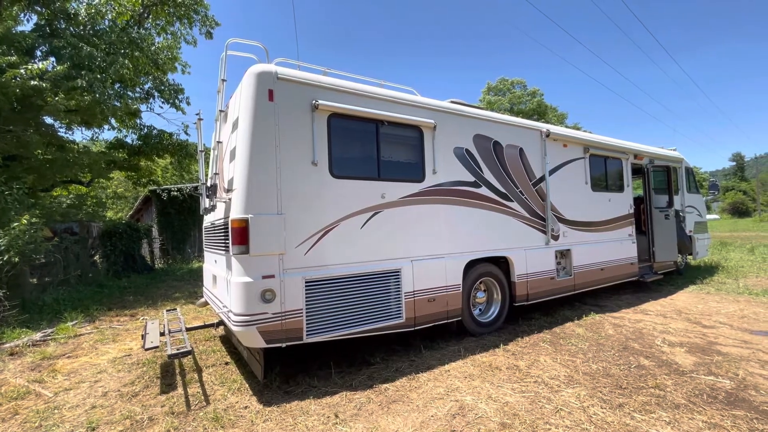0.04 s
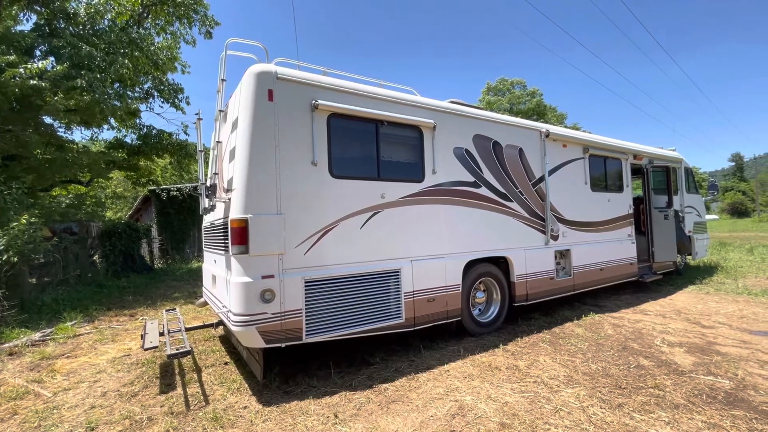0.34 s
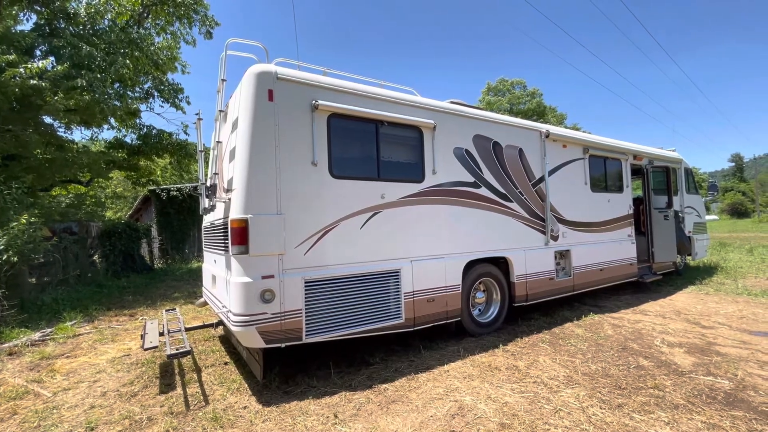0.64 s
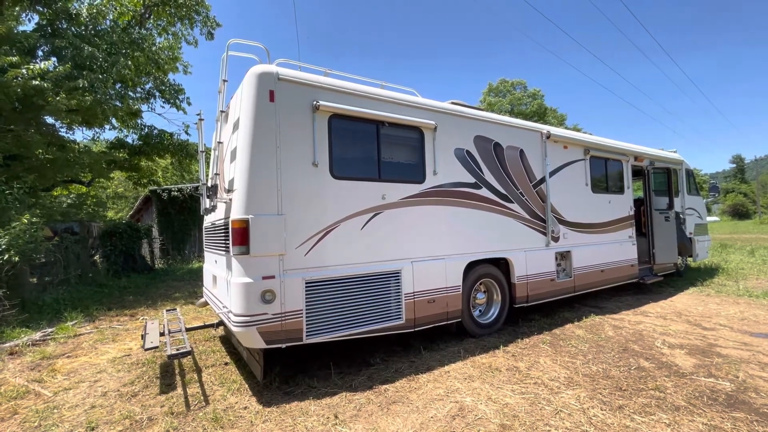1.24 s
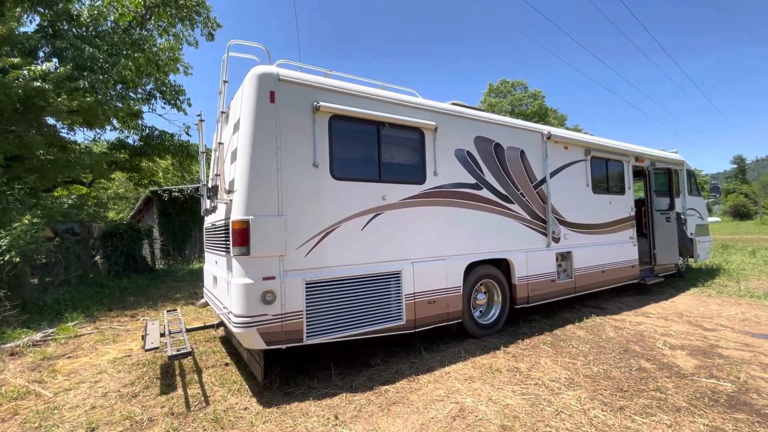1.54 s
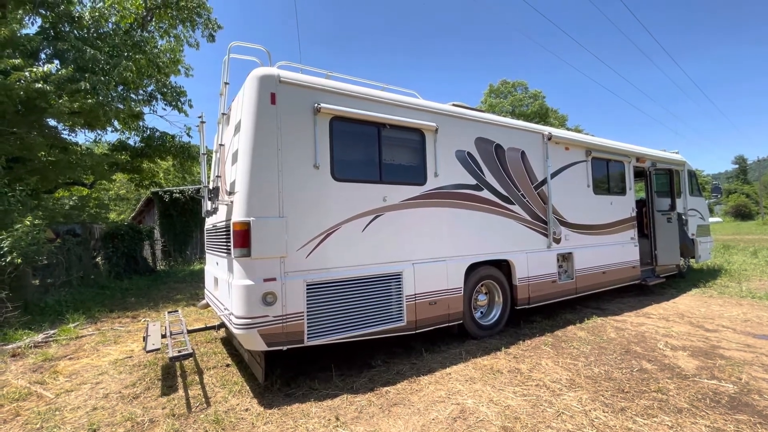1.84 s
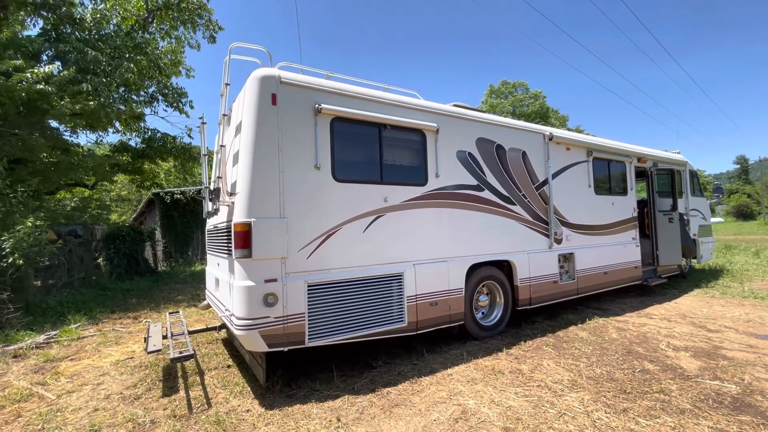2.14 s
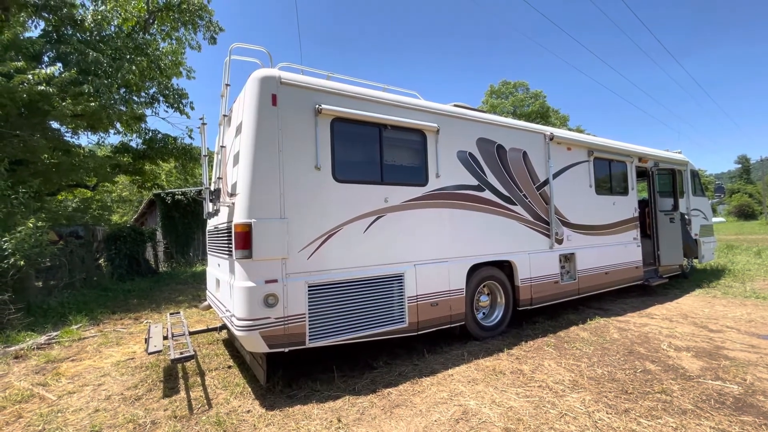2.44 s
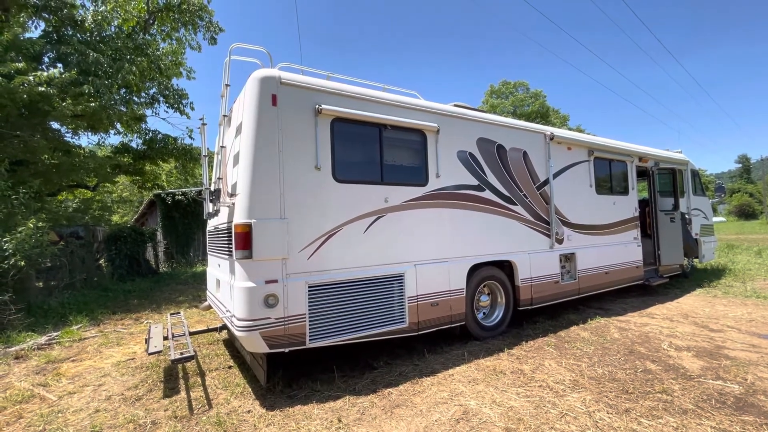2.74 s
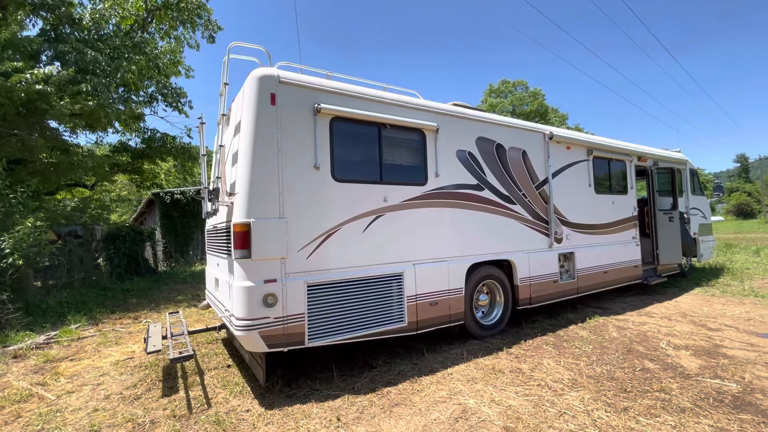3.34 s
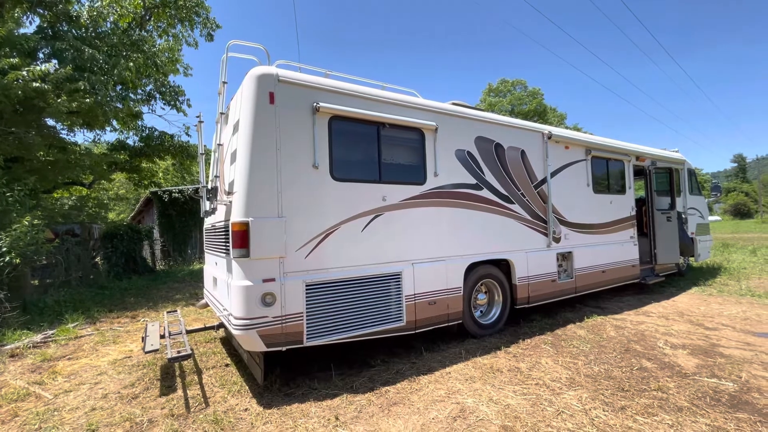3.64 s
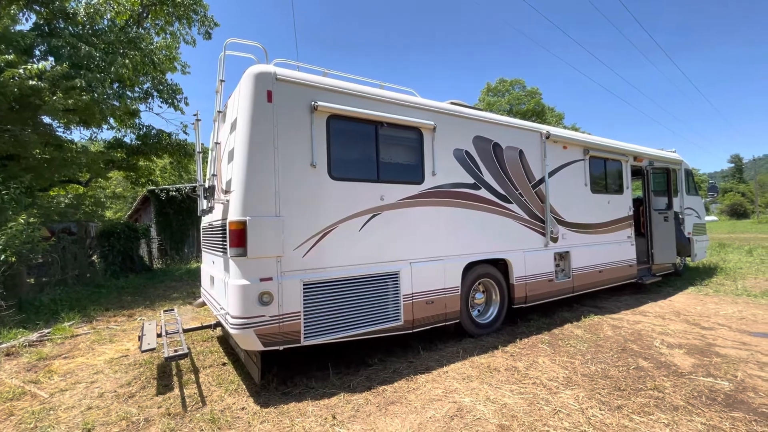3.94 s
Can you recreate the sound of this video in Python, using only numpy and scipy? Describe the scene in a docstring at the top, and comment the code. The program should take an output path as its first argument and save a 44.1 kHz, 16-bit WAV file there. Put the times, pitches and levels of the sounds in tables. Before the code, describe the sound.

A motorhome's diesel engine starts outdoors, a few metres away. After a quiet generator drone with thin hiss, the starter clacks in and grinds in pulses, then the engine catches with knocks, metal clanks and a low exhaust boom.

```python
"""Motorhome diesel, cold start.

Outdoors, a few metres from the rear corner. A small engine, probably the generator, drones; something
hisses. The starter pinion clacks in and the gears grind, sagging into each compression. Cylinders catch:
knocks ring the block, loose metal clanks, gas puffs down the pipe and the exhaust begins to boom."""
import sys
import numpy as np
from scipy import signal
from scipy.fft import rfft, irfft, next_fast_len
from scipy.io import wavfile

SR = 44100
rng = np.random.default_rng(int(sys.argv[2]) if len(sys.argv) > 2 else 0)


def log_audio(samples):
    """Write samples as a 16-bit WAV file to the path given in sys.argv[1]."""
    # one column per channel
    frames = np.atleast_2d(samples).T
    # limit to full scale, then quantise
    limited = np.clip(frames, -1, 1)
    pcm = np.round(limited * 32767).astype(np.int16)
    wavfile.write(sys.argv[1], SR, pcm)


N = 176400
TIME_S = np.arange(N) / SR

# cylinder firings: start_s, knock_db, puff_db
FIRINGS = [(2.927, -20.5, -29), (3.119, -21.5, -22.5), (3.172, -13, -23.5), (3.248, -10, -16.5),
           (3.309, -15, -11.5), (3.347, -7.5, -24), (3.397, -8.5, -21), (3.425, -11, -15.5),
           (3.459, -12, -14.5), (3.496, -11.5, -15.5), (3.534, -20, -16.5), (3.714, -10, -25),
           (3.75, -14, -19), (3.787, -7.5, -18.5), (3.821, -10.5, -25), (3.858, -15.5, -18.5),
           (3.889, -13, -33), (3.923, -15.5, -41), (3.982, -18, -43)]
# block and exhaust pipe spectra: freq_hz, density_db
KNOCK_SPECTRUM = [(200, -18.5), (400, -9.5), (1000, 5), (1320, 2), (1800, -8), (2400, -11.5), (5000, -25),
                  (7000, -34), (8800, -35), (13000, -52)]
PIPE_SPECTRUM = [(25, -26.5), (45, 3.5), (100, 2), (160, 3), (200, -5), (240, -0.5), (300, -5), (420, -10),
                 (700, -29)]
# resonances of block and bay, loose metal, generator casing: freq_hz, width_hz, lift_db
BLOCK_MODES = [(639, 7.7, 6.5), (762, 43, 4), (876, 60, 4.5), (1016, 21, 6.5), (1199, 21, 5), (1324, 96, 8),
               (1438, 62, 4)]
CLANK_MODES = [(5450, 190, 13.5)]
CASING_MODES = [(1382, 110, 10.5), (1649, 50, 10.5), (1995, 64, 9.5), (2568, 40, 11), (3216, 40, 9)]

# starter surges, one after each compression: start_s, length_s, grind_db, hum_db
SURGES = [(2.057, 0.014, -29.5, -45), (2.12, 0.11, -29, -26.5), (2.344, 0.096, -27.5, -27.5),
          (2.485, 0.072, -26, -28.5), (2.615, 0.077, -27, -36.5), (2.752, 0.064, -26, -32),
          (2.871, 0.076, -25.5, -36.5), (3.027, .045, -25.5, -29), (3.114, 0.036, -28, -50)]
# grind between surges: time_s, level_db
GRIND_LEVEL = [(1.89, -47), (1.925, -27), (1.98, -31), (2.3, -30), (2.7, -33), (3.1, -32.5), (3.35, -29.5),
               (3.5, -58)]
# gear mesh whine: armature_multiple, level_db
MESH_ORDERS = [(5, 1.5), (7, -22), (12, -12), (13, -3), (16, -8)]
# freewheeling pinion: time_s, pitch_hz, level_db
WHIR = [(2.92, 350, -31.5), (3.14, 414, -35), (3.25, 430, -57)]
# pinion slam and bounces: start_s, level_db
PINION_HITS = [(1.9435, -9), (1.951, -15.5), (1.957, -29)]
# gear grind and pinion slam spectra: freq_hz, density_db
GRIND_SPECTRUM = [(180, -44.5), (300, -6.5), (349, -3), (486, -5.5), (1110, -1.5), (1400, 2), (2300, -12),
                  (4190, -12.5), (4590, -16.5), (7500, -21.5), (8510, -15), (11000, -21), (14300, -41)]
PINION_SPECTRUM = [(200, -17), (500, -29), (800, -0.5), (1400, 3.5), (1800, -13.5), (2900, -2.5),
                   (4000, -14), (5800, -5), (9000, -7), (13000, -25)]

# gear and valve rattle: time_s, level_db
CLATTER_LEVEL = [(3.1, -39), (3.3, -33.5), (3.46, -20.5), (3.55, -21.5), (3.65, -23.5), (3.73, -22.5),
                 (3.81, -17.5), (3.86, -23), (4, -24)]
# clanks as the engine overruns the starter, clinks as it picks up: start_s, level_db
CLANKS = [(3.128, -24), (3.177, -25), (3.263, -25.5), (3.314, -17), (3.400, -26), (3.4155, -17),
          (3.434, -16.5), (3.472, -21.5)]
CLINKS = [(3.79, -50), (3.823, -42)]
# clinking steel modes: pitch_hz
CLINK_HZ = [1955, 2140, 2172, 2566]
# rattle and clank spectra: freq_hz, density_db
CLATTER_SPECTRUM = [(300, 2.5), (550, -3.5), (1000, 2.5), (1400, -2.5), (1750, -7), (2500, -4.5),
                    (4000, -11.5), (7000, -22), (9000, -17.5), (13000, -40)]
CLANK_SPECTRUM = [(1500, -21), (2800, 12), (3700, 12.5), (5500, 10), (7000, 0), (9000, 11), (13000, -14)]

# exhaust boom at twice the firing rate: time_s, pitch_hz, level_db
BOOM = [(3.43, 54, -27), (3.584, 54.85, -20.5), (3.69, 53.27, -27), (3.886, 59.93, -22.5), (4.0, 59, -20)]
# boom partials: pitch_multiple, level_db
BOOM_ORDERS = [(1, 0), (2, -8), (4, -12.5)]
# body rumble: time_s, level_db
RUMBLE_LEVEL = [(1.93, -63), (1.98, -24), (2.02, -35), (2.08, -33), (3.02, -30), (3.12, -25), (3.22, -27.5),
                (3.5, -20), (3.66, -25.5), (4, -26)]

# generator partials: cycle_multiple, level_db
GENERATOR_ORDERS = [(3, -19), (4, -12.5), (5, -14.5), (6, -19), (7, -10), (8, -4.5), (10, -6.5), (13, -24),
                    (16, -9.5), (18, -17), (20, -15.5), (28, -21.5)]
# dips in its main hum: time_s
HUM_DIPS_S = [0, .44, 1.11, 1.45, 1.66, 1.88, 2.3]
# generator casing and hiss spectra: freq_hz, density_db
CASING_SPECTRUM = [(18, -18), (30, -6), (211, -3.5), (401, -13), (489, -9), (675, -26), (1050, -20),
                   (2320, -23), (2900, -22.5), (6880, -33), (8590, -28), (11000, -37), (14300, -72)]
HISS_SPECTRUM = [(5000, -19), (7200, -16), (8600, 1.5), (9600, -2), (11500, -5), (13000, -29)]
# hiss envelope: time_s, level_db
HISS_LEVEL = [(0, -44), (1.31, -43), (1.39, -49)]

# left-right likeness: freq_hz, coherence
COHERENCE = [(150, .99), (300, .93), (700, .7), (4000, .62), (9000, .88)]
# left channel delay: freq_hz, lag_rad
LEFT_LAG = [(150, 0.26), (350, 0.4), (700, 1.38), (4000, 1.77), (8500, 1.56), (12000, 0.48)]
# source balance: freq_hz, left_minus_right_db
ENGINE_PAN = [(60, -0.5), (350, -1), (640, -5), (1150, -3), (2070, -0.5), (3730, -5), (6700, -9),
              (11000, 2)]
STARTER_PAN = [(200, 0), (350, 10), (640, -2.5), (1150, -17.5), (2070, 0.5), (3730, -8.5), (6700, -10),
               (11000, 9)]
CLANK_PAN = [(2000, 1), (5500, -17), (11000, 9)]
BACKGROUND_PAN = [(60, -3.3), (11000, -2.9)]

METAL_RIPPLE_DB = 3.5


def combustion():
    """Each firing knocks the block, lingers in the bay and puffs down the exhaust."""
    knocks = [(s, db) for s, db, _ in FIRINGS]
    puffs = [(s, db) for s, _, db in FIRINGS]
    strike = impacts(per_s=4400, spread_db=6) * blows(knocks, attack_s=.0021, hold_s=.0048, decay_s=.012)
    bay = from_db(-9) * noise() * blows(knocks, attack_s=.0085, hold_s=.005, decay_s=.019)
    gas = noise() * blows(puffs, attack_s=.007, hold_s=.0063, decay_s=.037)
    block = radiate(strike + bay, KNOCK_SPECTRUM, ENGINE_PAN, BLOCK_MODES, METAL_RIPPLE_DB)
    return block + radiate(gas, PIPE_SPECTRUM, ENGINE_PAN)


def clatter():
    """Gears and valves rattle, shaking steel parts that clink; loose metal clanks."""
    rattle = impacts(per_s=900, spread_db=4) * level(CLATTER_LEVEL)
    taps = noise() * blows(CLINKS, attack_s=.001, hold_s=.0018, decay_s=.0033) + from_db(-43) * rattle
    t60_s = .059
    r = from_db(-60 / (t60_s * SR))
    clinks = sum(signal.lfilter([0, np.sin(w)], [1, -2 * r * np.cos(w), r * r], taps + 1e-18)
                 for w in 2 * np.pi * np.array(CLINK_HZ) / SR)
    clanks = noise() * blows(CLANKS, attack_s=.00043, hold_s=.0071, decay_s=.0026)
    block = radiate(rattle + clinks, CLATTER_SPECTRUM, ENGINE_PAN, BLOCK_MODES, METAL_RIPPLE_DB)
    return block + radiate(clanks, CLANK_SPECTRUM, CLANK_PAN, CLANK_MODES, METAL_RIPPLE_DB)


def exhaust():
    """The pipe booms once the engine runs, over the rumble of the shaken body."""
    s, hz, db = np.transpose(BOOM)
    attack_s = .037
    turns = rotation(np.interp(TIME_S, s, hz), wobble=.012, wobble_hz=20)
    swell = np.clip((TIME_S - s[0]) / attack_s, 0, 1) * from_db(np.interp(TIME_S, s, db))
    boom = swell * partials(turns, BOOM_ORDERS)
    return boom + radiate(noise() * level(RUMBLE_LEVEL), PIPE_SPECTRUM, ENGINE_PAN)


def starter():
    """Gears grind and whine, the motor hums; backlash rattles as each faster surge begins."""
    turns = armature_turns()
    surge = sum(blows([(s, db)], attack_s=.0022, hold_s=length_s, decay_s=.0033)
                for s, length_s, db, _ in SURGES)
    grind_gain = np.hypot(level(GRIND_LEVEL), surge)
    grind = (gear_growl(turns) + from_db(-2) * impacts(per_s=2000, spread_db=3.5)) * grind_gain
    whine = mesh_whine(turns) * surge
    whir = pinion_whir()
    lash_hits = [(s, db - 1.5) for s, _, db, _ in SURGES[3:]]
    lash = noise() * blows(lash_hits, attack_s=.001, hold_s=.0061, decay_s=.023)
    gears = radiate(grind + lash, GRIND_SPECTRUM, STARTER_PAN, ripple_db=METAL_RIPPLE_DB)
    hum_gain = sum(from_db(db) * np.exp(-(3 * (TIME_S - s - .76 * length_s) / length_s) ** 2)
                   for s, length_s, _, db in SURGES)
    return gears + whine + hum_gain * partials(turns, [(1, .55)]) + whir


def armature_turns():
    """The armature spins up, leaps after each compression and sags into the next."""
    top_hz, sag_hz_per_s, free_share, spin_up_s = 265.4, 800, .32, .05
    speed = []
    for s, length_s, *_ in SURGES:
        sag_hz = sag_hz_per_s * (1 - free_share) * length_s
        speed += [(s, top_hz), (s + free_share * length_s, top_hz), (s + length_s, top_hz - sag_hz)]
    spin_up = 1 - np.exp(-np.maximum(TIME_S - PINION_HITS[0][0], 0) / spin_up_s)
    return rotation(np.interp(TIME_S, *np.transpose(speed)) * spin_up, wobble=.015, wobble_hz=81)


def gear_growl(turns, flicker_db=5):
    """Flickering armature orders: odd in the mid signal, even in the side."""
    growl = np.array([sum(from_db(flicker_db * drift(16.6)) * partials(turns, [(k, 0)])
                          for k in range(lowest, 18, 2)) for lowest in (3, 4)])
    return from_db(-10) * growl / growl.std()


def mesh_whine(turns, flicker_db=5, roughness=.6):
    """Meshing teeth whine roughly, to the right."""
    whine = 0
    for order in MESH_ORDERS:
        flicker = from_db(flicker_db * np.tanh(drift(25)))
        whine += flicker * (1 + roughness * drift(82)) * partials(turns, [order])
    return from_db([[-18], [-11]]) * whine


def pinion_whir():
    """The freewheeling pinion rises in pitch and fades."""
    s, hz, db = np.transpose(WHIR)
    turns = rotation(np.interp(TIME_S, s, hz), wobble=.03, wobble_hz=93)
    return level(np.c_[s, db]) * (TIME_S < s[-1]) * np.sin(2 * np.pi * turns)


def solenoid():
    """The pinion slams into the ring gear and bounces."""
    slam = noise() * blows(PINION_HITS, attack_s=.001, hold_s=.002, decay_s=.006)
    return radiate(slam, PINION_SPECTRUM, STARTER_PAN, BLOCK_MODES, METAL_RIPPLE_DB)


def generator(cycle_hz=17.8):
    """Engine orders drone, the main hum swells and dips; casing noise throbs four times a cycle."""
    turns = rotation(cycle_hz, wobble=.0026, wobble_hz=2.15)
    drone = sum(from_db(drift(2.5)) * partials(turns, [order]) for order in GENERATOR_ORDERS)
    beat = np.interp(TIME_S, HUM_DIPS_S, np.arange(len(HUM_DIPS_S)), right=.5)
    hum = (1 - .45 * np.cos(2 * np.pi * beat)) * partials(turns, [(12, 1.5)])
    throb = 1 + .064 * np.cos(8 * np.pi * turns)
    casing = radiate(noise() * throb, CASING_SPECTRUM, BACKGROUND_PAN, CASING_MODES)
    return from_db(-38.5) * (drone + hum) + from_db(-37.5) * casing


def hiss():
    """Thin hiss; drops shortly before the start."""
    return radiate(noise() * level(HISS_LEVEL), HISS_SPECTRUM, BACKGROUND_PAN)


def radiate(mid_side, spectrum, balance, modes=(), ripple_db=0):
    """Mid and side excitations ring a body (unit power gain); returns left and right."""
    size = next_fast_len(N + SR // 4, True)
    hz = np.arange(size // 2 + 1) * SR / size
    lesser_modes_hz = np.arange(1500, SR / 2, 70)
    lesser_db = ripple_db * np.interp(hz, lesser_modes_hz, rng.normal(size=len(lesser_modes_hz)), left=0)
    modes_db = sum(db / (1 + (2 * (hz - mode_hz) / width_hz) ** 2) for mode_hz, width_hz, db in modes)
    gain = from_db(at_hz(spectrum, hz) + lesser_db + modes_db)
    cepstrum = irfft(np.log(gain / np.sqrt(np.mean(gain ** 2))), size)
    causal_fold = np.r_[1, np.full(size // 2 - 1, 2), np.zeros(size - size // 2)]
    body = np.exp(rfft(cepstrum * causal_fold))  # minimum phase
    coherence = at_hz(COHERENCE, hz)
    sign = np.array([[1], [-1]])
    mid, side = rfft(mid_side, size)
    stereo = np.sqrt((1 + coherence) / 2) * mid + sign * np.sqrt((1 - coherence) / 2) * side
    pan = from_db(sign * at_hz(balance, hz) / 2) * np.exp(-.5j * sign * at_hz(LEFT_LAG, hz))
    pan /= np.sqrt(np.mean(np.abs(pan) ** 2, axis=0))
    return irfft(stereo * pan * body, size)[:, :N]


def blows(rows, attack_s, hold_s, decay_s):
    """Envelope of (start_s, level_db) blows, summed in power."""
    power = 0
    for start_s, db in rows:
        age_s = np.maximum(TIME_S - start_s, 0)
        rise = np.minimum(age_s / attack_s, 1)
        fall = np.exp(-np.maximum(age_s - attack_s - hold_s, 0) / decay_s)
        power += (from_db(db) * rise * fall) ** 2
    return np.sqrt(power)


def impacts(per_s, spread_db):
    """Two independent showers of uneven impacts; rms 1."""
    hits = (rng.random((2, N)) < per_s / SR) * np.sign(noise())
    hits *= from_db(spread_db * np.clip(noise(), -2, 2))
    return hits / hits.std()


def rotation(speed_hz, wobble, wobble_hz):
    """Turns made at a wobbling speed."""
    return np.cumsum(speed_hz * (1 + wobble * drift(wobble_hz))) / SR


def partials(turns, orders):
    """Sines on multiples of a rotation; 0 dB is rms 1."""
    return sum(np.sqrt(2) * from_db(db) * np.sin(2 * np.pi * (k * turns + rng.random()))
               for k, db in orders)


def drift(corner_hz):
    """Low-passed random wander; spread 1."""
    hop, settle = 40, 2000
    r = np.exp(-2 * np.pi * corner_hz * hop / SR)
    slow = signal.lfilter([1], [1, -2 * r, r * r], rng.standard_normal(N // hop + settle + 2))[settle:]
    return np.interp(np.arange(N) / hop, np.arange(len(slow)), slow / slow.std())


def noise():
    """Two independent white noises."""
    return rng.standard_normal((2, N))


def level(rows):
    """Gain along (time_s, level_db); silent before the first row."""
    return from_db(np.interp(TIME_S, *np.transpose(rows), left=-120))


def at_hz(rows, hz):
    """Table lookup on a log-frequency axis."""
    row_hz, value = np.transpose(rows)
    return np.interp(np.log(hz + 1), np.log(row_hz), value)


def from_db(db):
    """Decibels to gain."""
    return 10 ** (np.asarray(db) / 20)


def scene():
    """All sources, stereo."""
    return generator() + hiss() + solenoid() + starter() + combustion() + clatter() + exhaust()


def record(dry):
    """Microphone: treble notch, soft clip, low-pass."""
    notch_hz, stop_hz = 10330, 12850
    notched = signal.lfilter(*signal.iirnotch(notch_hz, Q=4.44, fs=SR), dry)
    rounded = 1.25 * np.tanh(notched / 1.365)
    return signal.sosfilt(signal.cheby2(14, 60, stop_hz, fs=SR, output="sos"), rounded)


dry = scene()
out = record(dry)
log_audio(out)
```